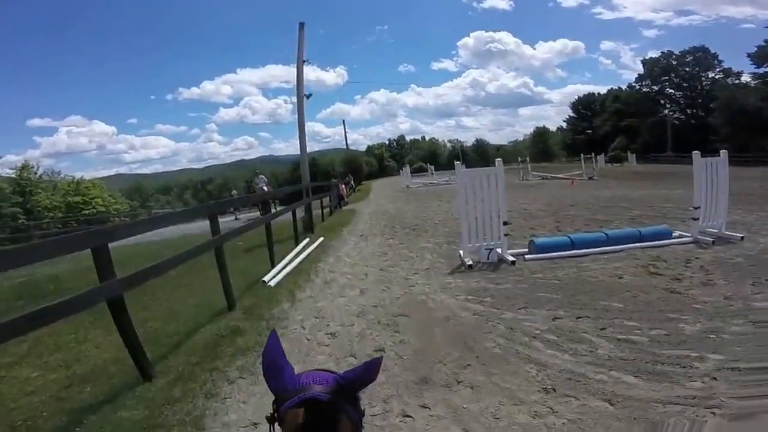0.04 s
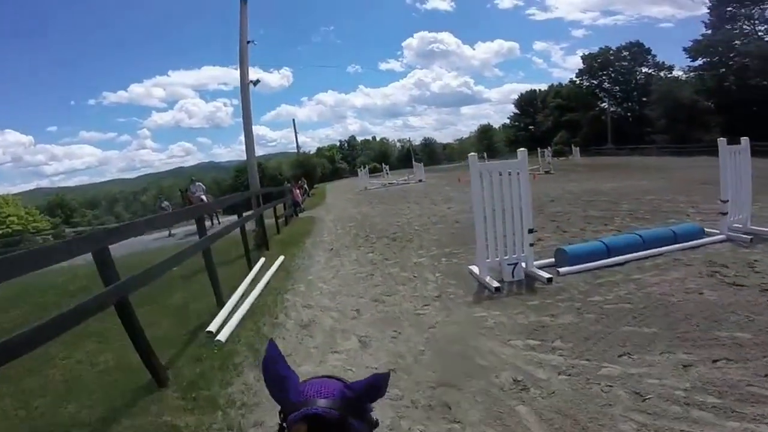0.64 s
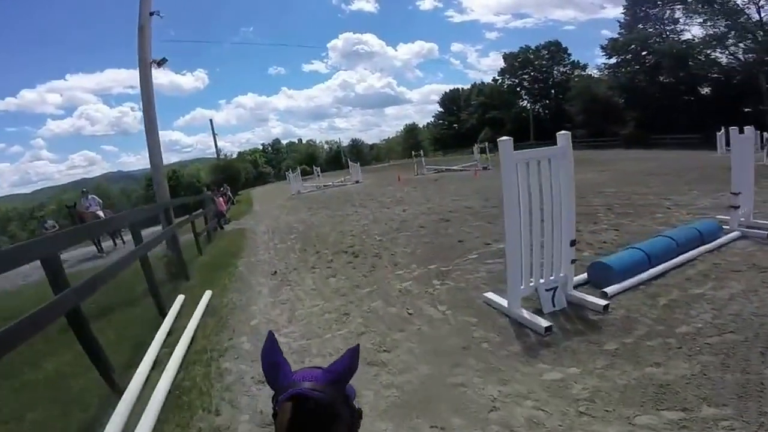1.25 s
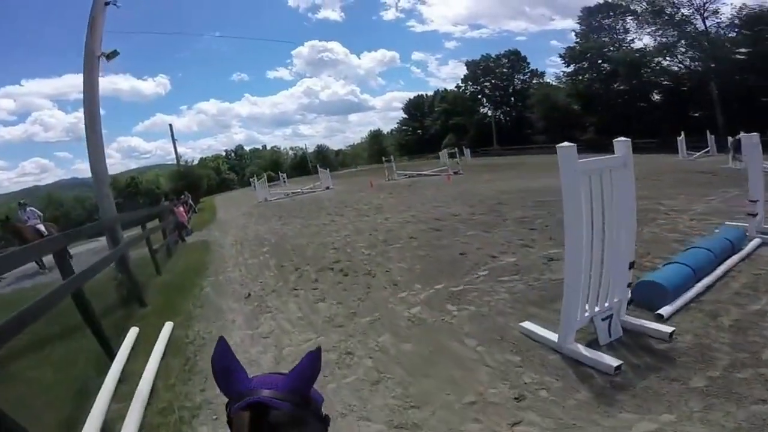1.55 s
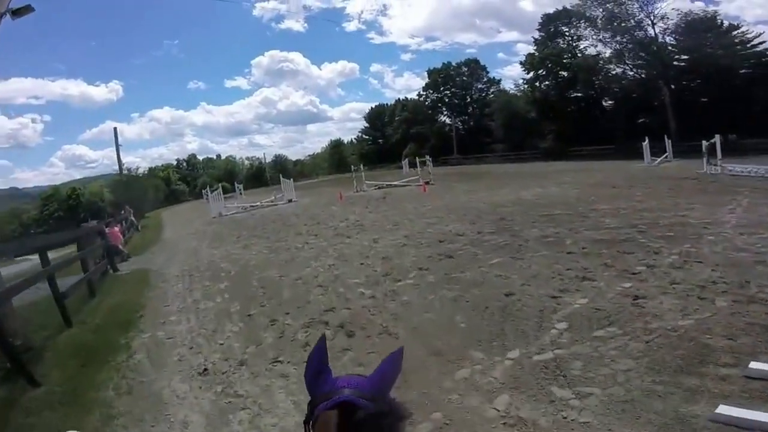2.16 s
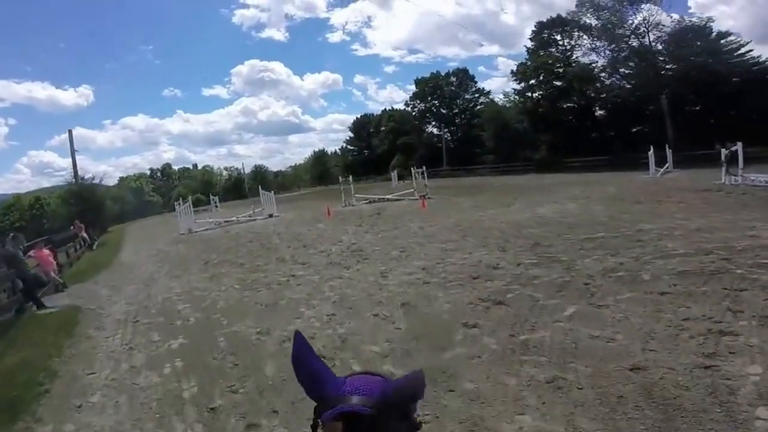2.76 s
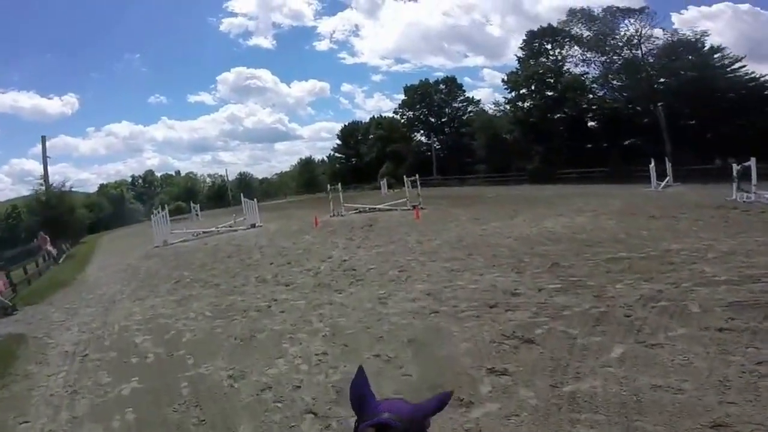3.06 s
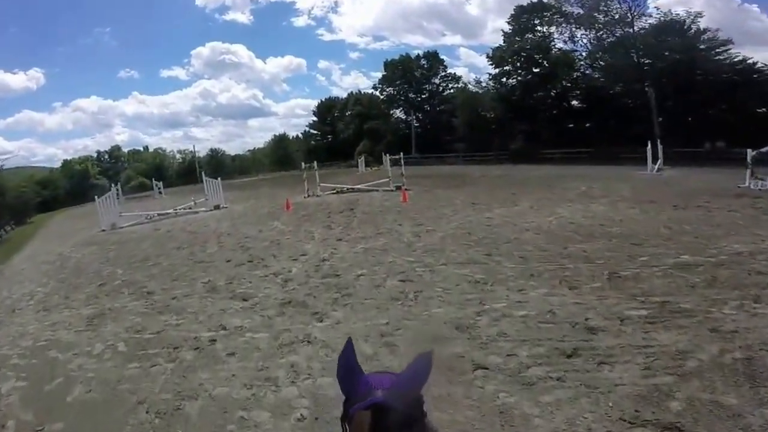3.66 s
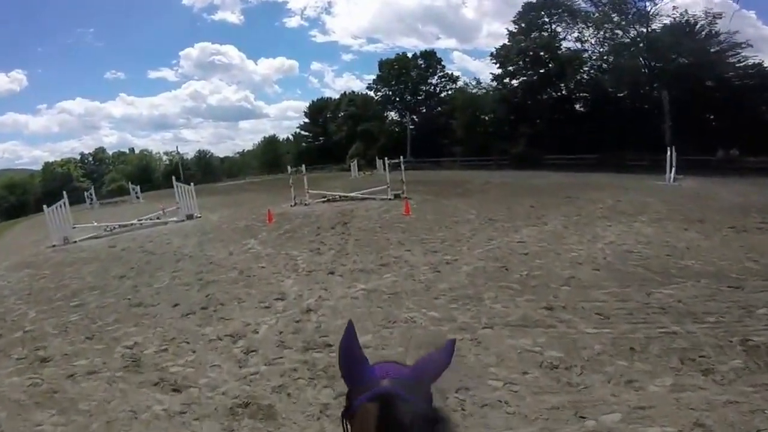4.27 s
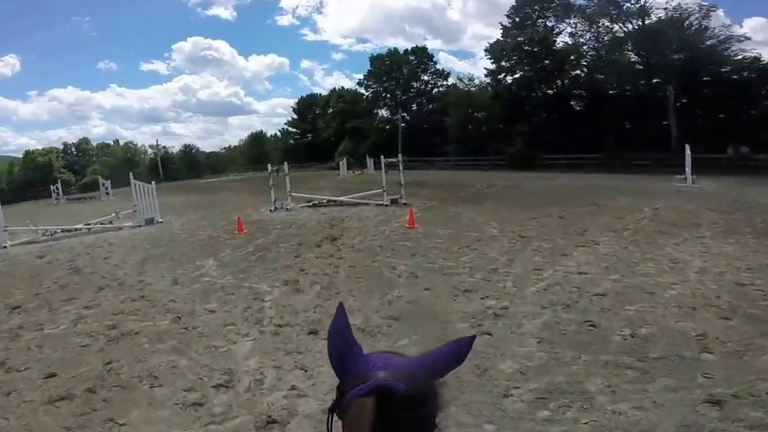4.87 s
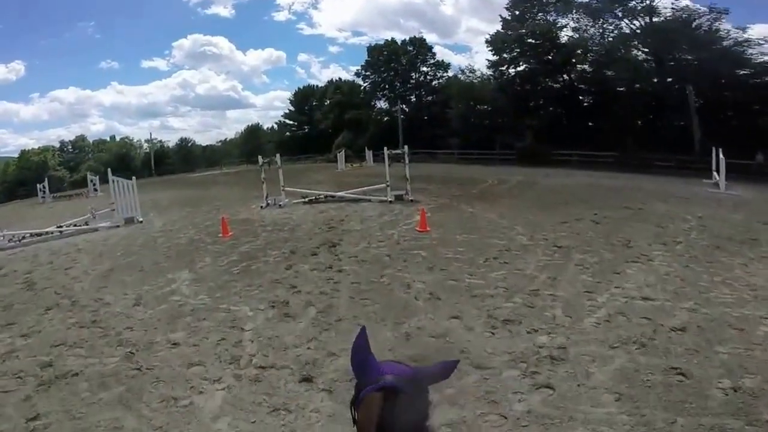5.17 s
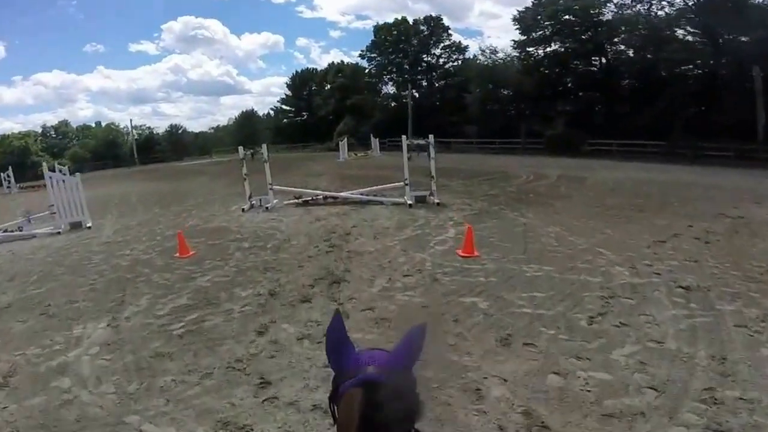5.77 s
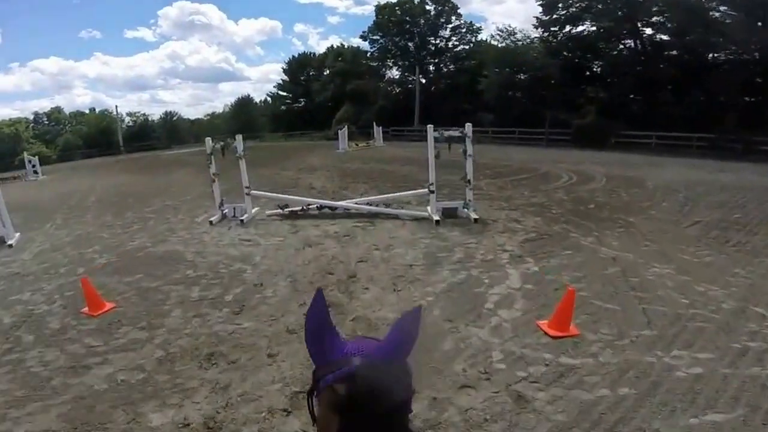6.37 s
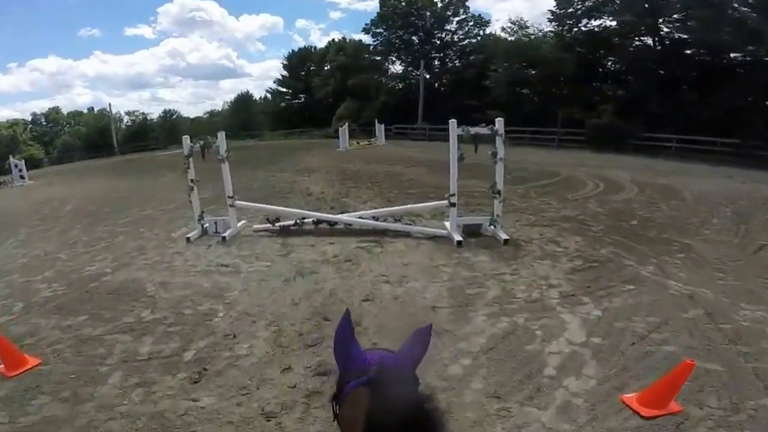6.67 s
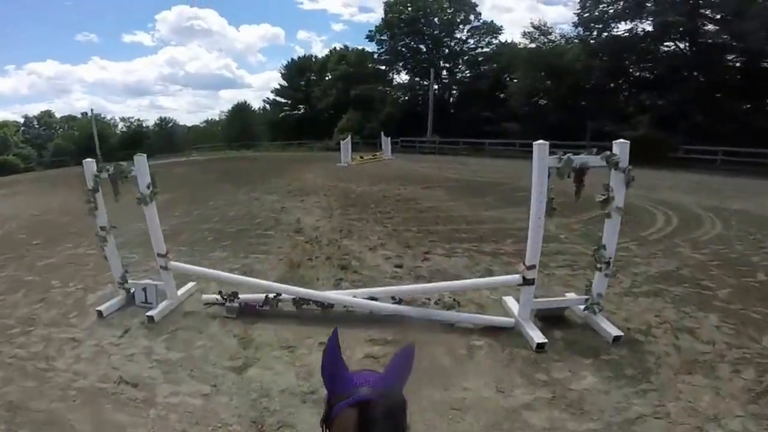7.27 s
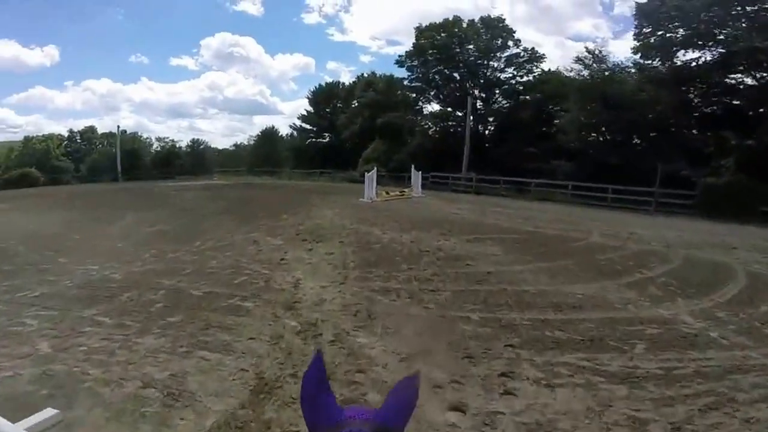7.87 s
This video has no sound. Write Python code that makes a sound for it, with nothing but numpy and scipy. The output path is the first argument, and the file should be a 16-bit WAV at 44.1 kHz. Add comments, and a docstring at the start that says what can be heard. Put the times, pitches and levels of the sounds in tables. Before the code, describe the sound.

Low wind rumbles and hisses steadily around a rider's enclosed microphone as a horse canters on outdoor sand. The hoofbeats are soft, muffled thumps, mixed with irregular plastic clicks, short rubs and a few tiny leather squeaks. Thuds and rattles grow busier and harder as the horse gathers pace, and the camera mount gives one loud clack as it pushes off to jump. There is no echo.

```python
"""Canter towards a jump

A horse canters on arena sand, heard from a cased camera worn by the rider. Hoof landings thud up through
the saddle and rock the camera's mount, which knocks and scrapes against the plastic case, harder as the
strides quicken, and snaps against its stop at take-off. Leather squeaks and rustles faintly. Underneath,
riding wind rumbles, hums and hisses in the case, whose hollow note swells once a stride."""
import sys
import numpy as np
from scipy.fft import rfft, irfft, next_fast_len
from scipy.io import wavfile
from scipy.ndimage import map_coordinates

SR = 44100
rng = np.random.default_rng(int(sys.argv[2]) if len(sys.argv) > 2 else 0)


def master_out(mix):
    """Clip the mix to full scale and print it as 16-bit PCM to the path in sys.argv[1]."""
    frames = np.transpose(np.atleast_2d(mix))
    ceiling = np.clip(frames, -1, 1)
    pcm = np.round(ceiling * 32767).astype(np.int16)
    wavfile.write(sys.argv[1], SR, pcm)


N = 358091

# Accented hoof landings: start_s, blow_db, relative_sway_db
LANDINGS = [(0.199, -34, -23.5), (0.552, -50, -33.5), (0.759, -41.5, -33.5), (1.117, -42, -39),
            (1.3, -38.5, -28.5), (1.687, -27.5, -29), (1.863, -34.5, -34.5), (1.886, -37, -61),
            (2.344, -60, -31.5), (2.412, -32, -37), (2.439, -39, -37), (2.594, -48.5, -32.5),
            (3.467, -27, -22), (3.523, -29, -21.5), (3.621, -38.5, -57), (4.033, -37, -26),
            (4.136, -37.5, -46), (4.573, -34.5, -32.5), (5.102, -36.5, -27), (5.123, -31.5, -31),
            (5.189, -38.5, -44), (5.58, -54, -32), (5.796, -36, -24.5), (6.134, -35, -40),
            (6.153, -34.5, -47), (6.21, -48, -26), (6.31, -32.5, -25.5), (6.574, -36.5, -31),
            (6.615, -38, -22), (6.685, -39.5, -23.5), (6.8, -31, -26.5), (7.1, -27, -38), (7.152, -40, -18),
            (7.185, -33, -18.5), (7.303, -30, -25.5), (7.375, -47, -29), (7.543, -32, -24),
            (7.657, -29, -48), (7.699, -41, -25), (7.796, -29, -20), (7.835, -33.5, -20.5)]
# The mount hitting the case: start_s, force_db, edge_treble_db, rebound_delay_s
MOUNT_KNOCKS = [(0.196, -27, -5, 0.0029), (1.689, -18, 3.5, 0.0021), (1.874, -41, 4, 0.0031),
                (1.889, -45.5, 0, 0.0021), (3.469, -28, 0.5, 0.0012), (4.031, -26, 3, 0.0027),
                (4.148, -43.5, -1, 0.0024), (5.122, -38, 6, 0.0018), (5.800, -28.5, -5, 0.0024),
                (6.136, -42.5, -4, 0.0032), (6.315, -22, 6, 0.0019), (6.581, -38.5, -3, 0.003),
                (6.664, -42, 7, 0.00245), (6.802, -20.5, 2, 0.0013), (6.843, -35, 4, 0.0013),
                (7.305, -23.5, -2, 0.00074), (7.545, -39, 12, 0.0024), (7.658, -18.5, -1.5, 0.00089),
                (7.798, -24, 2.5, 0.0015)]
# The mount hitting its stop: start_s, peak_db
STOP_SNAPS = [(1.715, -31), (7.8285, -1.9), (7.875, -39)]
# Mount and tack rubbing: centre_s, half_width_s, relative_level_db
RUB_STROKES = [(0.019, 0.0035, -43), (1.131, 0.0051, -49.5), (3, 0.019, -50), (3.346, 0.0064, -49),
               (3.472, 0.026, -43.5), (3.533, 0.015, -34.5), (3.94, 0.028, -50.5), (4.034, 0.0076, -33),
               (4.153, 0.014, -44.5), (5.197, 0.012, -48), (5.414, 0.03, -49), (5.933, 0.0088, -46.5),
               (6.144, 0.012, -40), (6.595, 0.017, -35), (6.654, 0.037, -42.5), (7.127, 0.028, -35),
               (7.192, 0.014, -32.5), (7.325, 0.021, -32.5), (7.522, 0.019, -45), (7.669, 0.021, -38.5),
               (7.824, 0.027, -25.5), (7.893, 0.025, -35.5)]
# Tack squeaks: start_s, length_s, first_pitch_hz, last_pitch_hz, level_db, jitter_ratio, tilt_db_per_octave
TACK_SQUEAKS = [(2.588, 0.013, 1445, 1196, -42, 0.13, 1), (5.578, 0.019, 1434, 930, -43.5, 0.14, 2.5),
                (6.105, 0.02, 1476, 1280, -45.5, 0.06, -7)]

# Ringing modes: pitch_hz, level_db, t60_s
SADDLE_MODES = [(137, 1.5, 0.11), (205, -14, 0.068)]
MOUNT_MODES = [(43.03, 3, 0.29), (33, -14.5, 0.079)]
CASE_MODES = [(400, 1, 0.015), (626, -11.5, 0.011), (946, -3, 0.013), (1427, -4, 0.018), (1926, -17, 0.033),
              (2340, 1.5, 0.0075), (2654, -7, 0.02), (2887, -8, 0.015), (3354, -14, 0.0066),
              (4510, -24, 0.0056)]
STOP_MODES = [(203, -18.5, 0.11), (352, -22, 0.072), (764, -13, 0.0089), (1045, -17.5, 0.014),
              (1313, -11.5, 0.018), (2484, 1.5, 0.011), (2604, 1, 0.01), (4390, -22.5, 0.0088)]

# Tone of an ordinary knock: frequency_hz, level_db
KNOCK_EQ = [(420, -19.5), (900, -20), (1400, -18.5), (2500, -25.5)]
# Harder knocks open up the treble: frequency_hz, db_per_force_db
KNOCK_GROWTH = [(420, 0.65), (900, 0.92), (1400, 1.13), (2500, 1.63)]
# Tone colours of the contacts and the air: frequency_hz, relative_level_db
SAND_EQ = [(50, -31), (100, -12), (150, 9), (210, 4.5), (300, -6), (420, -5), (650, -22.5), (1500, -70),
           (8000, -120)]
CRACK_EQ = [(500, -23), (2500, 14), (4000, -1), (7000, -7.5), (11000, -17), (15000, -37)]
RUB_EQ = [(200, -10), (400, 0), (750, -5), (1100, 1), (1420, 8.5), (1750, -4.5), (2100, -4.5), (2550, 3.5),
          (3100, -7), (3900, -18.5), (6000, -33), (14000, -53)]
SQUEAK_EQ = [(600, -30), (1200, -9), (1500, 4), (2100, 4.5), (2900, 3.5), (3600, -14), (4350, -3),
             (5200, -35), (12000, -50)]
RUMBLE_EQ = [(12, -6), (25, 2), (40, -5), (55, -3), (80, -15), (130, -15), (250, -39), (500, -73),
             (1500, -120)]
HUM_EQ = [(90, -27), (150, 0.5), (230, 3.5), (290, -1), (360, 1.5), (420, -3), (520, -6.5), (700, -12),
          (1100, -46), (6000, -120)]
HISS_EQ = [(300, -23), (550, -3.5), (750, 0), (1050, -2), (1200, -2), (1420, -4.5), (1750, -5.5),
           (2200, -8), (2650, -10), (3300, -11), (6000, -18), (10000, -25), (12500, -30.5), (15000, -38)]
HOLLOW_EQ = [(200, -24), (300, -7.5), (330, -3), (355, 0), (380, -9), (420, -21), (600, -72.5),
             (2000, -120)]

# Fader rides for the buffeting and for the case's hollow note: time_s, relative_level_db
WIND_FADER = [(0.0, -42.5), (0.27, -47.5), (2.24, -48), (2.47, -42.5), (3.98, -46), (4.21, -41.5),
              (4.88, -49), (5.56, -42.5), (6.6, -48), (6.76, -36), (6.92, -44), (7.8, -35.5), (7.96, -37.5),
              (8.12, -46.5)]
SURGE_FADER = [(0.5, -59), (2.2, -58), (2.75, -53), (4.4, -53.5), (5.9, -52), (6.45, -58.5), (7.0, -54),
               (8.0, -48)]

FIRST_LANDING_S, FIRST_STRIDE_S, QUICKEN_S, STRIDE_COUNT = 0.19, 0.572, 0.0062, 15
BEAT_OFFSETS_S, SOFT_BEAT_DB = [-0.14, 0, 0.115], -48.5  # the canter's three beats
PUSH_RISE_S, THUD_GAIN_DB_PER_S, RING_LOSS_DB_PER_S = 0.00713, 0.97, 0.6
ORDINARY_KNOCK_DB, REBOUND_DB = -24.5, -9.5
ORDINARY_RUB_DB, SCUFF_DB, SCUFF_HALF_WIDTH_S = -38.5, -53.5, 0.0095
CALM_WIND_DB, SURGE_LAG_S, SURGE_HALF_WIDTH_S = -45.5, 0.3, 0.16
HIGH_CUT_HZ = 15140


def hooves():
    """Each landing is a dead thud and a thump of packed sand; it rings the saddle and rocks the mount."""
    out, t = np.zeros(N), np.arange(SR // 2) / SR
    soft_beats = [(s + beat, SOFT_BEAT_DB, SOFT_BEAT_DB) for s in strides() for beat in BEAT_OFFSETS_S]
    rocking = ring(MOUNT_MODES, t).sum(0) * attack(t, 0.011)
    push = swell(t, rise_s=PUSH_RISE_S) * np.sin(np.pi * t / PUSH_RISE_S)
    for s, blow_db, sway_db in LANDINGS + soft_beats:
        # As the horse gathers pace, the weight moves from the saddle's ring to the thud.
        thud = amp(3.5 + THUD_GAIN_DB_PER_S * s) * push
        load = 1.017 + 0.058 * rng.standard_normal()  # the load shifts the saddle's pitch
        saddle = amp(6 - RING_LOSS_DB_PER_S * s) * ring(SADDLE_MODES, t * load).sum(0) * attack(t, 0.0073)
        sand = amp(-6) * swell(t, rise_s=0.0066) * noise(SAND_EQ, len(t))
        add(out, s, amp(blow_db) * (sand + saddle - thud) - amp(sway_db + 4.5) * rocking)
    return out


def knocks():
    """The mount rings the case and rebounds at once; harder hits reach its upper modes and chatter."""
    out, t = np.zeros(N), np.arange(SR // 8) / SR
    mode_hz = np.array(CASE_MODES)[:, 0]
    for s, force_db, edge_db, delay_s in MOUNT_KNOCKS:
        growth_db = along(KNOCK_GROWTH, mode_hz) * (force_db - ORDINARY_KNOCK_DB)
        treble_db = along([(1400, 0.004), (2500, edge_db)], mode_hz)
        mode_db = along(KNOCK_EQ, mode_hz) + growth_db + treble_db
        gains = amp(mode_db + 0.5 * rng.standard_normal(len(mode_hz)))
        detune = 1 + 0.015 * rng.standard_normal()
        body = gains @ ring(CASE_MODES, t * detune) * attack(t, 0.00061)
        chatter = amp(mode_db[-1] - 15.5) * swell(t, rise_s=0.0023) * noise(RUB_EQ, len(t))
        crack = amp(mode_db[-1] - 32) * swell(t, rise_s=0.00032) * noise(CRACK_EQ, len(t))
        add(out, s, body + chatter + crack)
        add(out, s + delay_s, amp(REBOUND_DB) * body)
    return out


def snaps():
    """A hard jolt, above all the push-off for the jump, throws the mount against its stop."""
    out, t = np.zeros(N), np.arange(SR // 4) / SR
    body = ring(STOP_MODES, t).sum(0) * attack(t, 0.00081)
    for s, peak_db in STOP_SNAPS:
        crack = amp(-21) * swell(t, rise_s=0.00023) * noise(CRACK_EQ, len(t))
        snap = body + crack
        add(out, s, amp(peak_db) * snap / np.abs(snap).max())
    return out


def scrapes():
    """Tiny uneven slips, coloured by the case, swell and fade with each rub; firmer rubs are brighter."""
    out, t = np.zeros(N), np.arange(-4096, 4096) / SR
    scuffs = [(s + FIRST_STRIDE_S * rng.random(), SCUFF_HALF_WIDTH_S * (0.5 + rng.random()), SCUFF_DB)
              for s in strides()]
    for s, half_width_s, db in RUB_STROKES + scuffs:
        slips = rng.standard_normal(len(t))
        slips *= amp(5 * np.repeat(rng.standard_normal(len(t) // 32), 32))  # gritty 32-sample grains
        stroke = np.exp(-2 * (t / half_width_s) ** 2)
        tilt = -0.9 + 0.12 * (db - ORDINARY_RUB_DB)
        rub = amp(db - 4.5) * stroke * coloured(slips, RUB_EQ, tilt)
        add(out, s + t[0], rub[s + t >= 0])
    return out


def squeaks():
    """Leather sticks and slips with a rasp: the slip rate arches and falls as the strap lets go."""
    out = np.zeros(N)
    for s, length_s, first_hz, last_hz, db, roughness, tilt in TACK_SQUEAKS:
        progress = np.linspace(0, 1, round(length_s * SR))
        arch = np.sin(np.pi * progress)
        jitter = map_coordinates(rng.standard_normal(64), [progress * 12])
        glide_hz = first_hz + (last_hz - first_hz) * progress
        slip_hz = glide_hz * (1 + 0.082 * arch + roughness * jitter)
        phase = 2 * np.pi * np.cumsum(slip_hz) / SR
        slips = sum(np.sin(k * phase) / np.sqrt(k) for k in range(1, 5))
        rasp = amp(-9) * noise(CRACK_EQ, SR // 8)[:len(progress)]
        add(out, s, amp(db) * np.sqrt(np.abs(arch)) * (coloured(slips, SQUEAK_EQ, tilt) + rasp))
    return out


def wind():
    """Air buffets the case, drones inside it and hisses through its wall; one fader drives all three."""
    rise_db = fader(WIND_FADER) - CALM_WIND_DB
    gust = wobble(4.6)
    buffet = amp(CALM_WIND_DB + rise_db + 2.0 + 1.8 * gust + 2.4 * wobble(16)) * noise(RUMBLE_EQ, N)
    hum = amp(-55.5 + 0.04 * rise_db + 0.5 * gust + 1.34 * wobble(16)) * noise(HUM_EQ, N)
    hiss = amp(-59.5 + 0.13 * rise_db + 0.6 * wobble(24)) * noise(HISS_EQ, N)
    return buffet + hum + hiss


def hollow_note():
    """Once a stride the rider's forward surge blows air across the case and swells its hollow note."""
    t = np.arange(N) / SR
    airflow = sum(np.exp(-((t - s - SURGE_LAG_S) / SURGE_HALF_WIDTH_S) ** 2) for s in strides())
    return amp(fader(SURGE_FADER)) * airflow * noise(HOLLOW_EQ, N)


def rustle():
    """Leather and clothing shift all the time: a faint bed of short, uneven scuffs."""
    return amp(-68.5 + 5.4 * np.tanh(wobble(40)) + 1.5 * wobble(3.2)) * noise(RUB_EQ, N)


def strides():
    """The time of each stride's main landing; every stride is a little shorter than the last."""
    lengths = FIRST_STRIDE_S - QUICKEN_S * np.arange(STRIDE_COUNT)
    return FIRST_LANDING_S + np.cumsum(lengths) - lengths


def ring(modes, t):
    """One damped sine a row; neighbouring modes swing in opposite directions."""
    return np.array([(-1) ** k * amp(db - 60 * t / t60) * np.sin(2 * np.pi * hz * t)
                     for k, (hz, db, t60) in enumerate(modes)])


def attack(t, time_constant_s):
    """A fade-in that rounds off the onset."""
    return 1 - np.exp(-t / time_constant_s)


def swell(t, rise_s):
    """An envelope that peaks at 1 after rise_s and dies away."""
    return t / rise_s * np.exp(1 - t / rise_s)


def fader(points):
    """Read (time_s, level_db) points at every sample."""
    return np.interp(np.arange(N) / SR, *np.transpose(points))


def wobble(rate_hz):
    """Smooth random modulation, rate_hz knots a second."""
    return map_coordinates(rng.standard_normal(int(N * rate_hz / SR) + 4), [np.arange(N) * rate_hz / SR])


def noise(eq, size):
    """Coloured noise of rms 1."""
    return coloured(rng.standard_normal(next_fast_len(size)), eq)[:size]


def coloured(x, eq, tilt_db_per_octave=0):
    """Put x through an EQ, tilted between 500 and 5000 Hz, and scale it to rms 1."""
    hz = np.fft.rfftfreq(len(x), 1 / SR)
    tilt_db = tilt_db_per_octave * np.log2(np.clip(hz, 500, 5000) / 500)
    shaped = irfft(rfft(x) * amp(along(eq, hz) + tilt_db), len(x))
    return shaped / np.sqrt(np.mean(shaped ** 2) + 1e-20)


def along(points, hz):
    """Read (frequency_hz, value) points on a log axis."""
    point_hz, values = np.transpose(points)
    return np.interp(np.log(hz + 1), np.log(point_hz), values)


def amp(db):
    """Decibels to gain."""
    return 10 ** (np.asarray(db) / 20)


def add(track, start_s, sound):
    """Mix a sound into the track from start_s."""
    start = max(round(start_s * SR), 0)
    part = track[start:start + len(sound)]
    part += sound[:len(part)]


def scene():
    """A dry mono mix: everything reaches the microphone through the case, with no echo from the arena."""
    return (hooves() + knocks() + snaps() + scrapes() + squeaks() + rustle() + hollow_note() + wind())[None]


def record(dry):
    """The camera's band limit: a brick-wall high cut."""
    size = next_fast_len(N + SR // 2)
    passband = np.fft.rfftfreq(size, 1 / SR) < HIGH_CUT_HZ
    return irfft(rfft(dry, size) * passband, size)[..., :N]


dry = scene()
out = record(dry)
master_out(out)
```